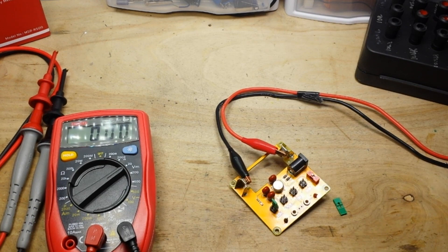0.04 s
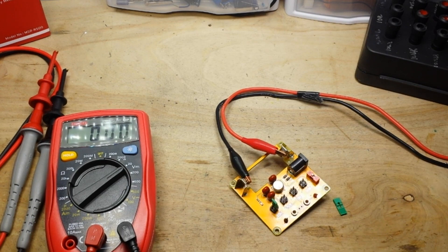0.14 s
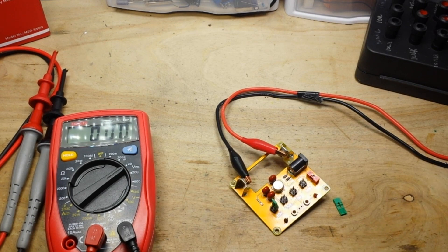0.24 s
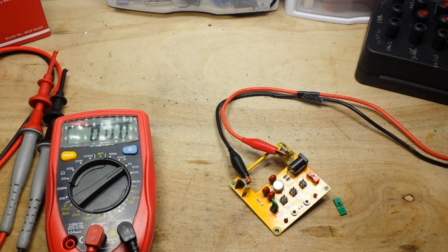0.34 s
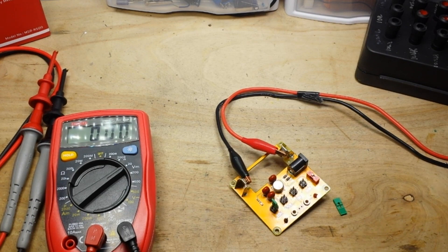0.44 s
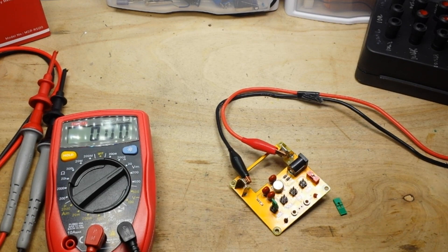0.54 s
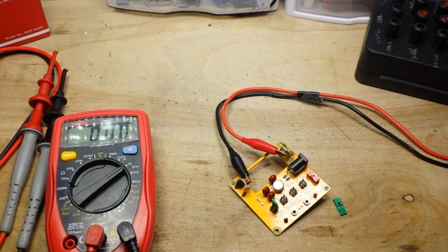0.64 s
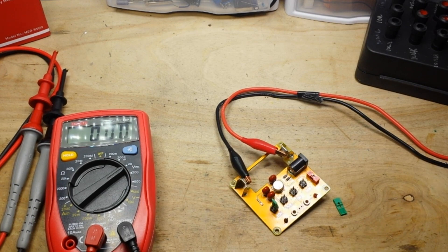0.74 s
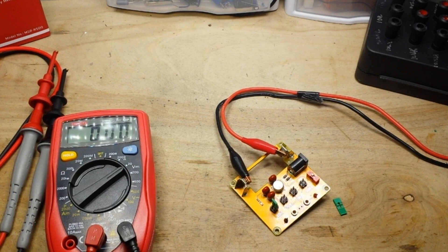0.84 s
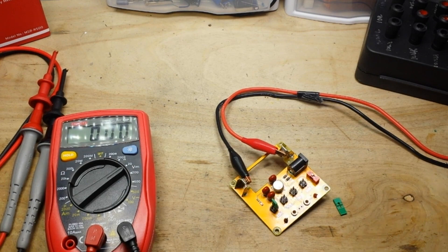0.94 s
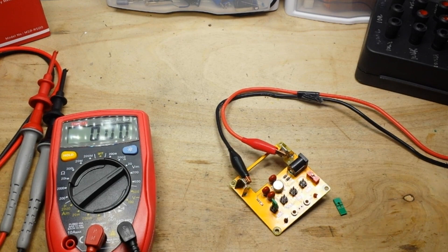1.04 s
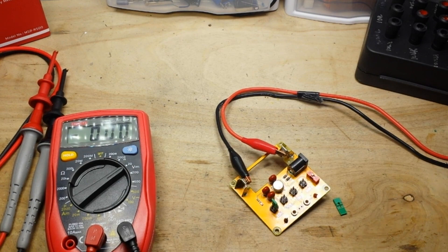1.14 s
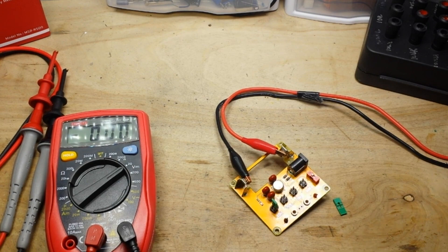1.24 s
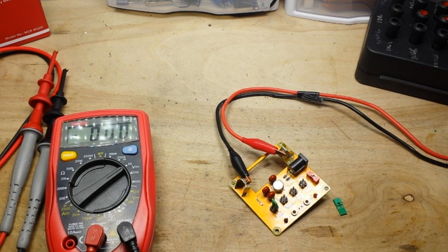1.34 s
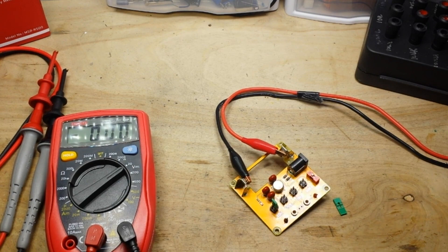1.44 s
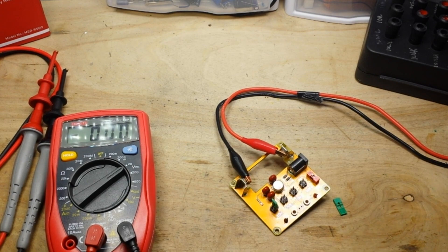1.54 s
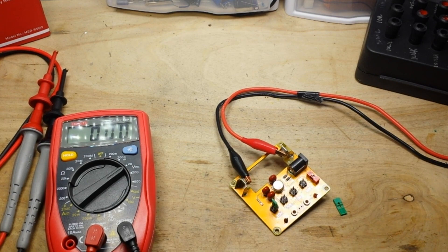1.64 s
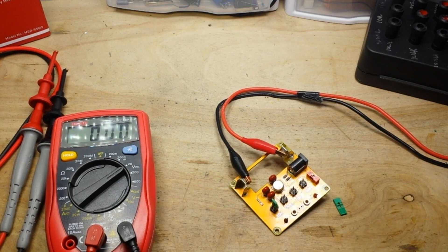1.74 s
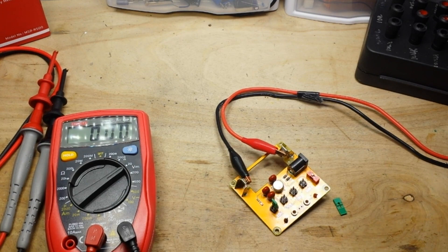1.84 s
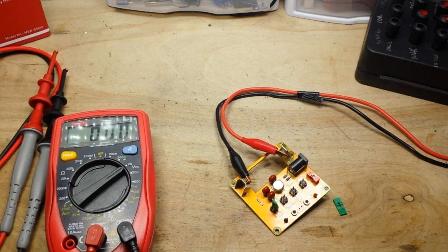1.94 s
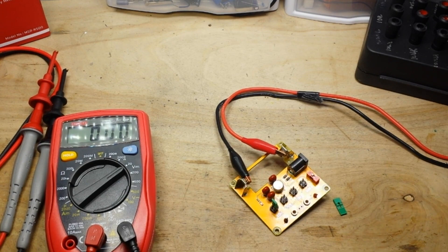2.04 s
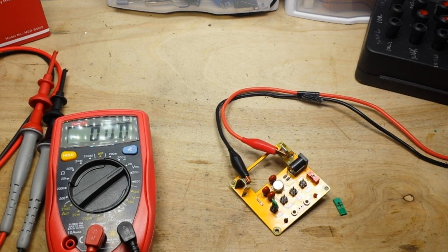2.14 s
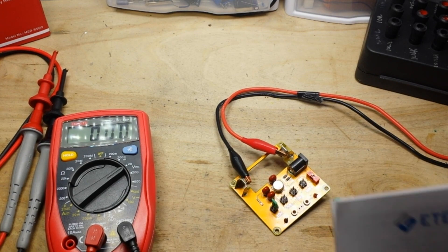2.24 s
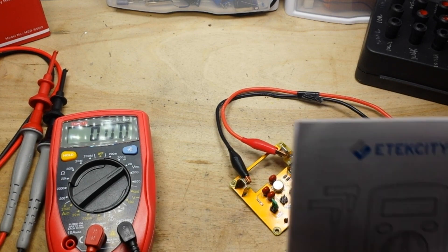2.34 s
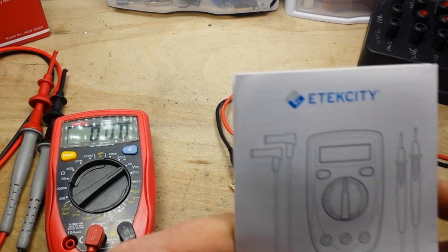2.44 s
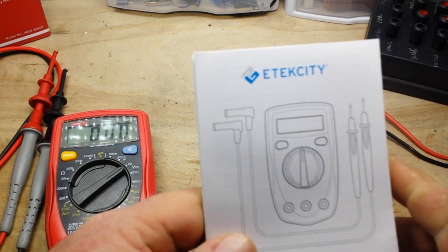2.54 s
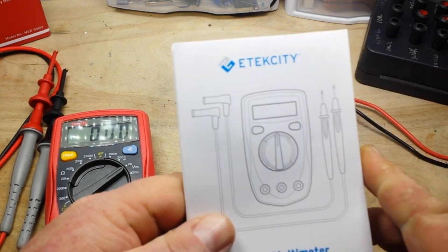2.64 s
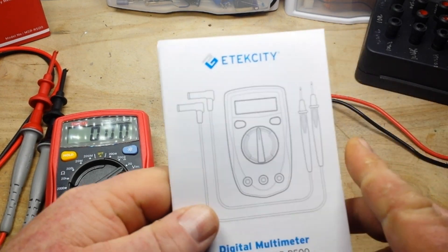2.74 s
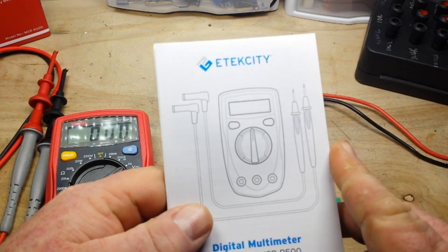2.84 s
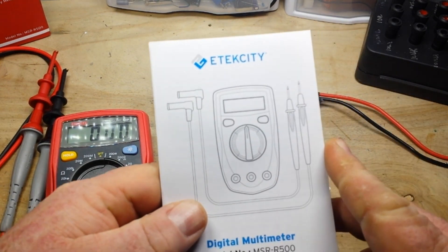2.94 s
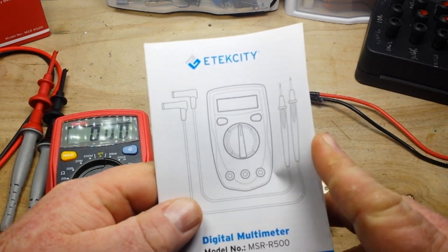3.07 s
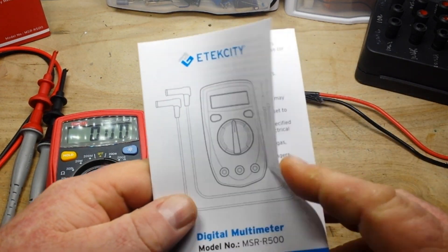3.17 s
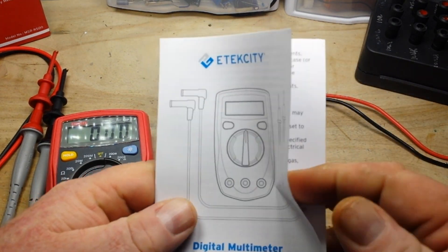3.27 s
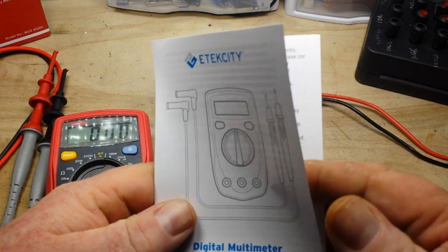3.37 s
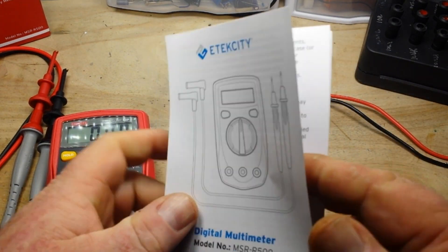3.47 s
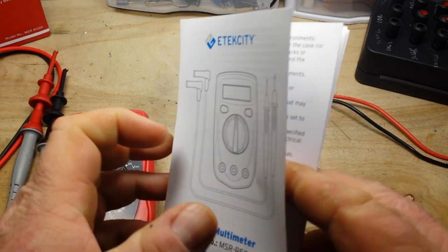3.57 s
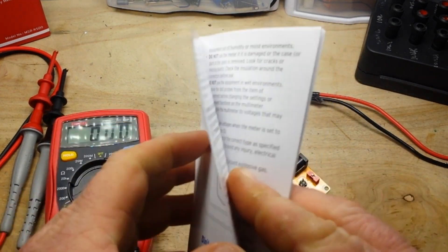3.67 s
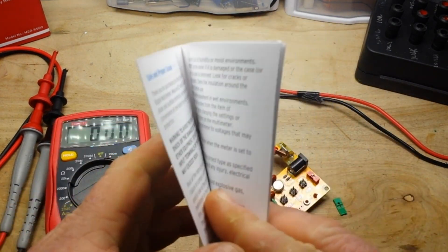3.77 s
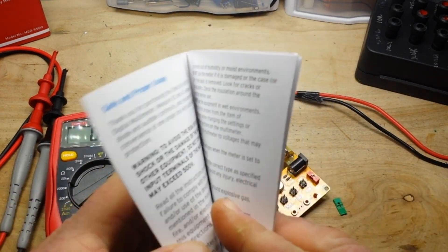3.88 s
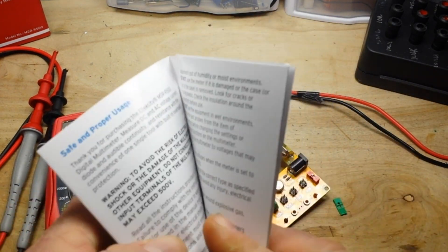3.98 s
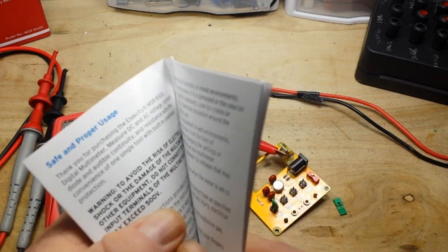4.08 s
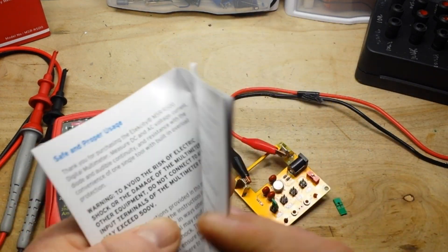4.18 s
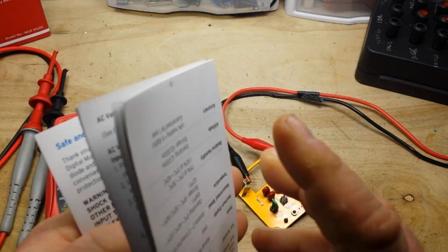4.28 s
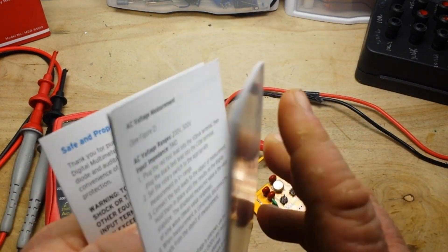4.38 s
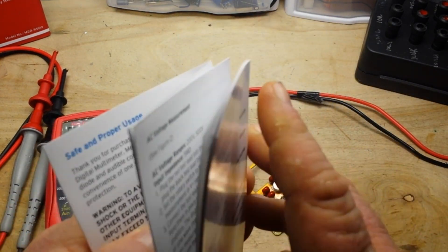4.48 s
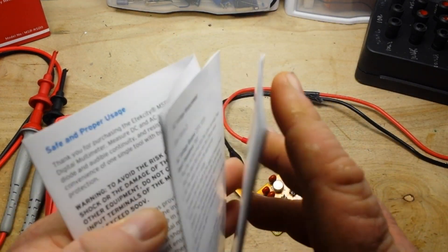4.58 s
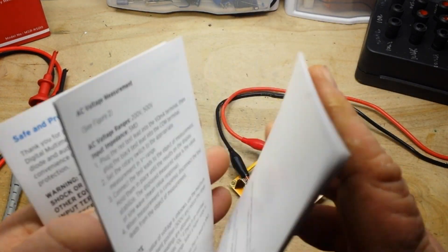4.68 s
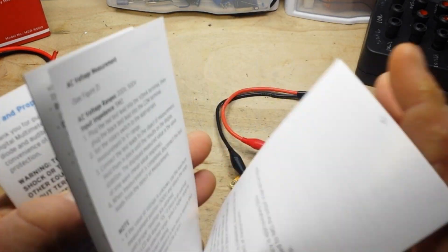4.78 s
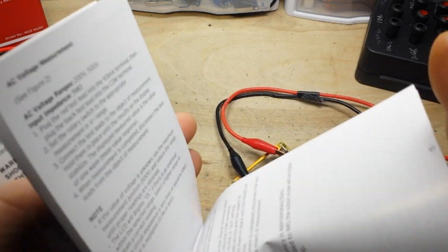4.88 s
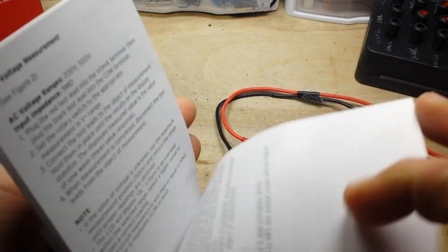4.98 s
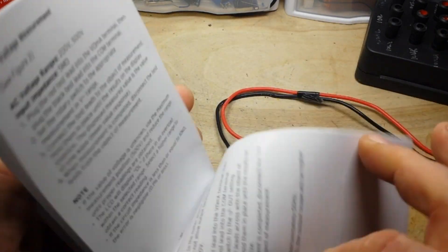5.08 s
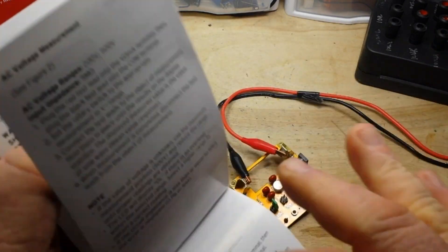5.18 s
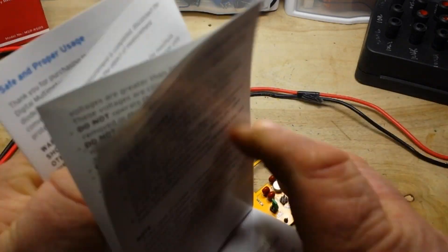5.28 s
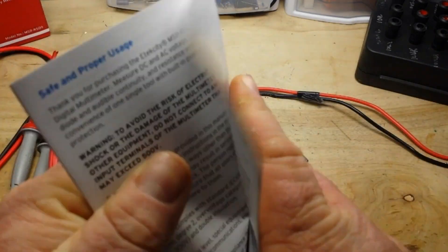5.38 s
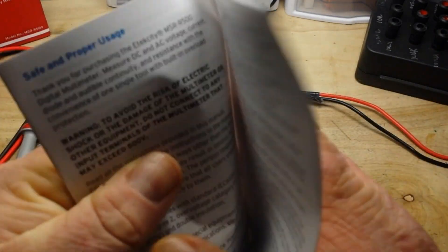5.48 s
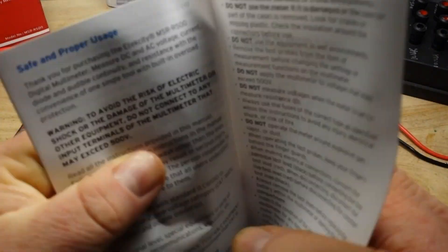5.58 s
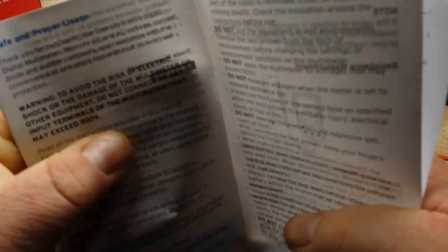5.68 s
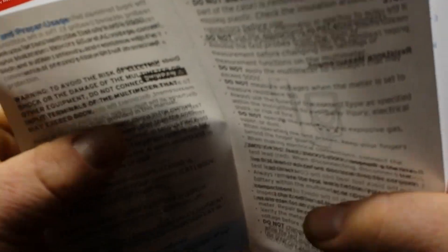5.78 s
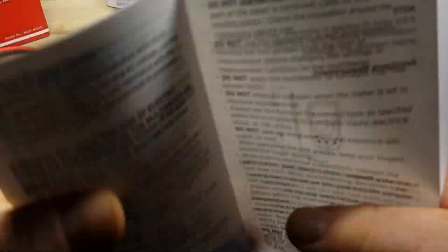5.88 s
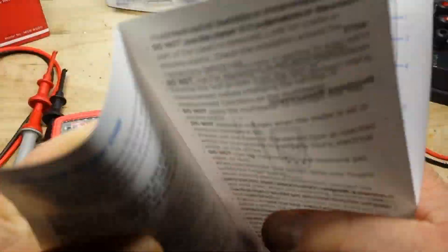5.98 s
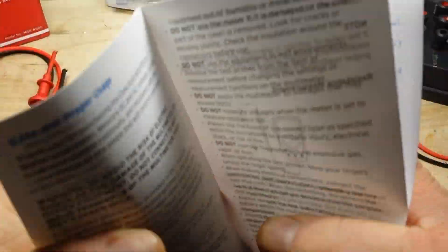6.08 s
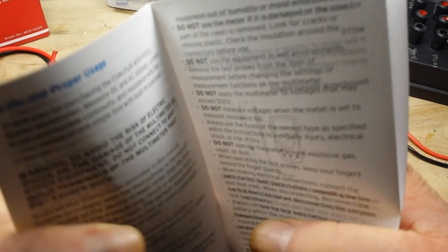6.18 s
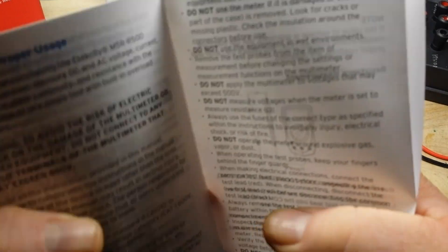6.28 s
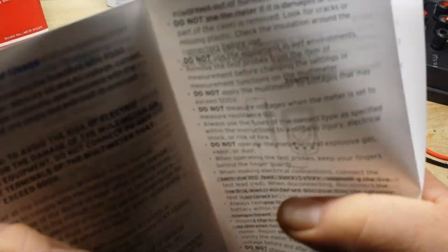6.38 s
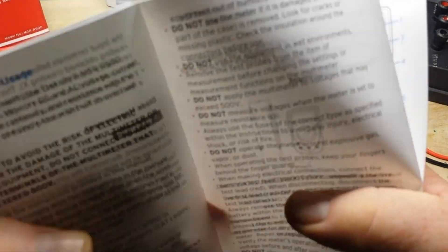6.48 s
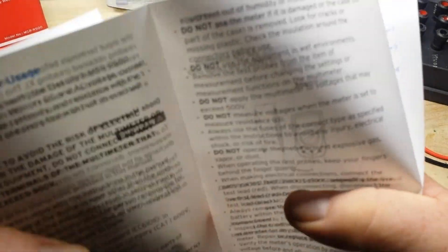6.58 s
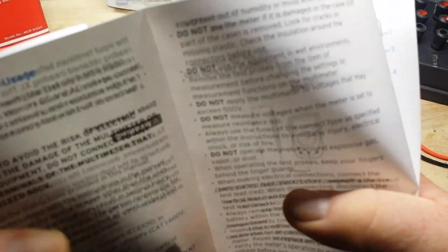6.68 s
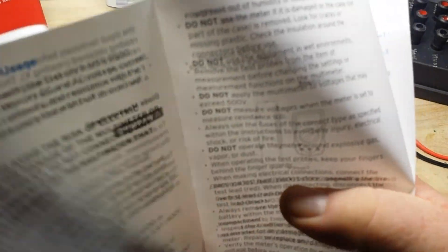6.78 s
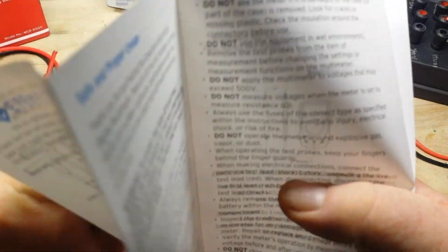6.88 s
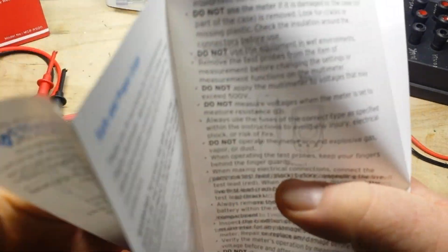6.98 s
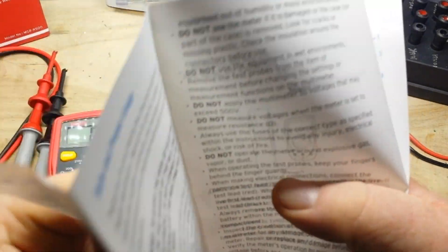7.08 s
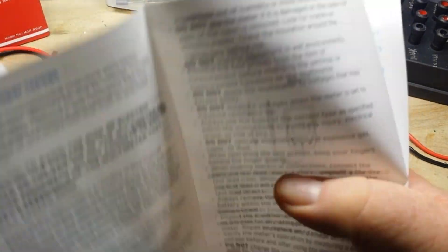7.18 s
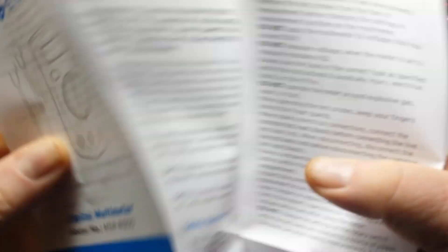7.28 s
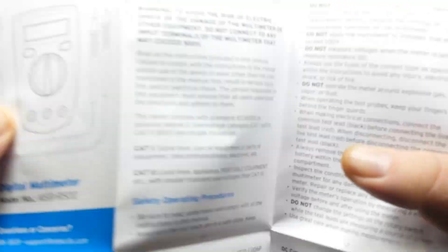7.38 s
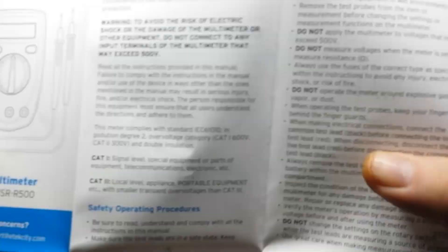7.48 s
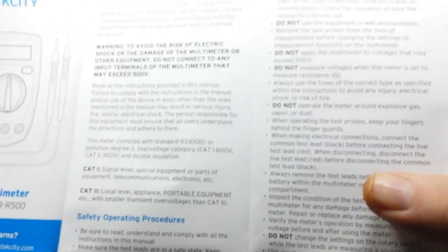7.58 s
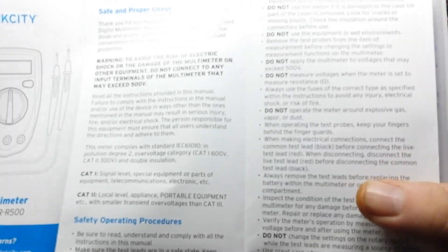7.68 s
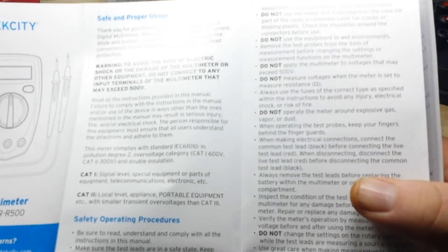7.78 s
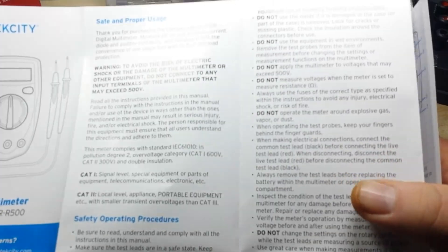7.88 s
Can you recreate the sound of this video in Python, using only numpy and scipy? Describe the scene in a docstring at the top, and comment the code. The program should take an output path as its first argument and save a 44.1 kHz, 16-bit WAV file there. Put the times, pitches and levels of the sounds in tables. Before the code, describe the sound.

A soft, steady fan drone with a barely audible thin whine runs throughout, in a small dry room. From 0 to 1 s there is almost nothing but a few tiny ticks. Around 1.1-1.9 s fingers rub softly on paper with small dry crinkles. At 2.2 s a short, high, zippy scrape marks the leaflet being picked up, then a near pause. From 3.2 to 4.3 s come gentle slides and light clicks; a crisp snap at 4.4 s starts brisker leafing, with a bright swish near 5.05 s. From 5.3 to 5.9 s creases crackle densely and sheets flap with dull pops. It quiets around 6 s, snaps again at 6.3-6.6 s, and peaks in a loud, sharp crackle at 6.8 s. Fuller, floppier rustling and pops follow at 7.2-7.6 s, then fade to faint rubbing by 7.9 s. Close stereo microphone, right side slightly earlier and brighter.

```python
"""A faint fan drones under a thin whine while fingers creep softly over a folded paper leaflet. The leaflet is
picked up, leafed through and opened out close by: creases snap, loose sheets flap, pages swish. Fan: shaped
noise, resonances and sines. Rubbing: random slips in three registers (flap, crack, fizz). Snaps: short noise
bursts through fold resonances. Pages popping over and low thuds of knocks: damped sines. Room: a short diffuse
tail. Two ports hear it all; the left one is later and shaded."""
import sys
import numpy as np
from scipy import signal
from scipy.fft import rfft, irfft
from scipy.io import wavfile
from scipy.ndimage import uniform_filter1d

SR = 44100
rng = np.random.default_rng(int(sys.argv[2]) if len(sys.argv) > 2 else 0)


def to_wav(s):
    """Save 16-bit WAV."""
    ch = np.atleast_2d(s).T  # columns
    pcm = np.round(np.clip(ch, -1, 1) * 32767)  # PCM
    wavfile.write(sys.argv[1], SR, pcm.astype(np.int16))


N = 349272


def amp(db):
    """Decibels to gain."""
    return 10 ** (np.asarray(db) / 20)


def unit(x):
    """Scales to rms 1."""
    return x / np.sqrt(np.mean(x ** 2) + 1e-20)


def read(points, hz):
    """Interpolates a table on a log-frequency axis."""
    f, value = np.transpose(points)
    return np.interp(np.log(hz + 1), np.log(f + 1), value)


def track(points, t):
    """Interpolates a (time, value) table linearly."""
    return np.interp(t, *np.transpose(points))


def bins(size):
    """Spectrum frequencies [Hz] for a number of samples."""
    return np.fft.rfftfreq(size, 1 / SR)


def resonance(hz, centre_hz, half_width_hz):
    """A peak of gain 1 that falls to half at its half width."""
    return 1 / (1 + ((hz - centre_hz) / half_width_hz) ** 2)


def noise(gain, size):
    """Noise of rms 1 with the given gain per frequency."""
    return unit(irfft(rfft(rng.standard_normal(size)) * gain, size))


def add(mix, s, sound):
    """Mixes a sound in at a time [s]."""
    part = mix[max(round(s * SR), 0):][:len(sound)]
    part += sound[:len(part)]


def causal(gain):
    """Minimum-phase impulse response with this gain."""
    log_gain = np.log(np.maximum(gain / gain.max(), 1e-4))
    circle = np.concatenate([log_gain, log_gain[-2:0:-1]])
    return gain.max() * np.fft.ifft(np.exp(np.conj(signal.hilbert(circle)))).real


def pair(a, b, likeness):
    """Two unrelated sounds become a partly alike left and right."""
    same = np.clip(read(likeness, bins(len(a))), 0, 1)
    left = same * rfft(a) + np.sqrt(1 - same ** 2) * rfft(b)
    return np.array([irfft(left, len(a)), a])


# broad fan noise: (frequency [Hz], relative density [dB])
FAN_AIR = [(20, -29), (50, -2.5), (85, -13), (115, -6), (160, -5.5), (250, 2), (350, -3.5), (600, -1.5),
           (1000, -11), (2200, -15), (3900, -20), (6000, -13.5), (7100, -11), (8500, -22), (10000, -20),
           (14500, -24.5), (16000, -67)]
# broad fan resonances: (centre [Hz], half width at half gain [Hz], level [dB])
FAN_DRONES = [(222, 14, -69.5), (292, 25, -64), (320.4, 4, -68.5), (420, 17, -73.5)]
# motor and blade tones: (frequency [Hz], level [dB])
FAN_HUM = [(59.5, -77), (120, -79.5), (205.6, -71.5), (290.7, -62.5), (300, -72), (389.5, -72),
           (419.8, -68.5)]
# left-right likeness of fan air and room echoes: (frequency [Hz], likeness [0-1])
DIFFUSE_LIKENESS = [(60, 0.54), (300, 0.76), (600, 0.24), (1200, 0), (3000, 0), (15000, 0.06)]


def fan(air_db=-57.5):
    """Steady air noise with a few resonances, and an even hum."""
    hz, t = bins(N), np.arange(N) / SR
    colour = amp(read(FAN_AIR, hz))
    air = pair(noise(colour, N), noise(colour, N), DIFFUSE_LIKENESS)
    drone = sum(amp(db) * noise(resonance(hz, f, width), N) for f, width, db in FAN_DRONES)
    hum = sum(amp(db) * np.sqrt(2) * np.sin(2 * np.pi * (f * t + rng.random())) for f, db in FAN_HUM)
    return amp(air_db) * air + drone + hum


def whine(centre_hz=1665, half_width_hz=3.9, level_db=-70.5):
    """One faint, slightly wavering tone, in opposite phase at the two ports."""
    tone = amp(level_db) * noise(resonance(bins(N), centre_hz, half_width_hz), N)
    return np.array([tone, -tone])


# how loudly the sheet flaps as the leaflet is handled: (time [s], flap at the usual force [dB])
FLAP_LOUDNESS = [(0, -46.5), (3.2, -31.5), (4.3, -38.5), (5.05, -38.5), (5.45, -37.5), (6.3, -37),
                 (6.83, -35.5), (7.25, -33), (7.92, -38.5)]
USUAL_FORCE_DB = -40
FLAP_GROWTH = 0.82  # dB per dB of force


def flap_level(s, force_db):
    """How loudly the whole sheet answers a force at a given time."""
    return track(FLAP_LOUDNESS, s) + FLAP_GROWTH * (force_db - USUAL_FORCE_DB)


FLAP_BRIGHT_LOSS = 0.63  # dB per dB of brightness


def rub_power(s, level_db, bright_db):
    """The power of a rub as flap, crack and fizz; bright rubs flap less."""
    flap_db = flap_level(s, level_db) - FLAP_BRIGHT_LOSS * bright_db
    return amp(np.vstack([flap_db, level_db, level_db + bright_db])) ** 2


# All rub levels below precede the register offsets in paper().
# soft creeping of the hands over the paper, rising and falling with the grip: (time [s], level [dB])
GRIP = [(0, -70), (1.03, -68.5), (1.15, -61.5), (1.82, -61.5), (1.95, -80), (2.33, -60.5), (2.5, -75),
        (2.9, -62), (3.3, -68), (3.62, -65.5), (4.25, -53), (4.58, -58.5), (5.15, -55), (5.27, -51.5),
        (5.6, -43), (5.98, -56.5), (6.45, -57.5), (6.9, -49.5), (7.45, -50.5), (7.56, -44.5), (7.78, -64),
        (7.92, -51)]
GRIP_BRIGHT_DB = 3
# fingers drawn evenly along the paper: (start [s], length [s], level [dB], fizz over crack [dB])
SLIDES = [(0, 0.11, -63, 6), (1.232, 0.2, -55.5, 1), (1.672, 0.036, -68, 19.5), (2.223, 0.061, -56.5, 11.5),
          (3.299, 0.13, -54.5, 7), (3.492, 0.018, -59.5, 8), (3.666, 0.15, -56, 6.5),
          (3.927, 0.22, -53.5, 8), (4.189, 0.09, -47, 9), (4.444, 0.019, -57, 4), (4.643, 0.092, -53, 7),
          (4.799, 0.063, -42.5, 3.5), (4.988, 0.064, -37.5, 3), (5.125, 0.038, -40.5, 4),
          (5.295, 0.049, -43, 0), (5.473, 0.051, -40.5, 5), (5.625, 0.11, -40, 3), (6, 0.086, -50, 3),
          (6.518, 0.073, -50, 7.5), (6.572, 0.045, -43, 3.5), (6.729, 0.027, -46.5, 2),
          (6.824, 0.071, -42.5, 1.5), (7.26, 0.037, -41.5, 1), (7.582, 0.015, -60, -1)]
SLIDE_ATTACK_S, SLIDE_RELEASE_S = 0.013, 0.038
# quick page swishes: (peak time [s], level [dB], fizz over crack [dB], flap [dB], rise [s], fall [s])
SWISHES = [(1.11, -48.5, 7.5, -51, 0.012, 0.019), (2.212, -50, 17, -48, 0.0057, 0.013),
           (2.294, -54, 8, -48, 0.011, 0.011), (3.199, -46.5, 5, -52.5, 0.019, 0.046),
           (4.682, -36, 7.5, -42, 0.006, 0.0041), (4.917, -40.5, 4.5, -44, 0.0081, 0.017),
           (5.055, -25, 10.5, -41, 0.023, 0.004), (5.353, -43.5, 12.5, -40, .005, 0.0069),
           (5.42, -33.5, 6, -35, 0.018, 0.011), (5.531, -39, 8, -41, 0.0054, .006),
           (5.584, -34, 3.5, -35, 0.007, 0.0069), (6.272, -38, 4.5, -43, 0.021, 0.013),
           (6.29, -33.5, 0, -40.5, 0.012, 0.0091), (6.827, -29, 11, -36, 0.0089, 0.0089),
           (7.149, -33, 3.5, -39, 0.022, 0.011), (7.205, -39.5, 4.5, -44, 0.018, 0.044),
           (7.337, -29.5, 0, -37, 0.0044, 0.033), (7.373, -31, -7, -31, 0.012, 0.024)]


def rubbing():
    """Rubbing strength per register: the creep of the grip, even slides, and swishes that swell and die."""
    t = np.arange(N) / SR
    power = rub_power(t, track(GRIP, t), GRIP_BRIGHT_DB)
    for s, length, level_db, bright_db in SLIDES:
        near = slice(*np.searchsorted(t, [s, s + length + .2]))
        lag = t[near] - s
        attack = np.minimum(lag / SLIDE_ATTACK_S, 1)
        release = np.exp(-np.maximum(lag - length, 0) / SLIDE_RELEASE_S)
        power[:, near] += rub_power(s, level_db, bright_db) * (attack * release) ** 2
    for s, level_db, bright_db, flap_db, rise, fall in SWISHES:
        near = slice(*np.searchsorted(t, [s - .2, s + .2]))
        lag = t[near] - s
        swell = np.exp(np.minimum(lag / rise, -lag / fall))
        power[:, near] += (amp([[flap_db], [level_db], [level_db + bright_db]]) * swell) ** 2
    return np.sqrt(power)


def bending(x, patchy_db=3.0, frames=22, bands=5):
    """As the sheet bends, its resonances wander and recolour the friction."""
    z = signal.stft(x, nperseg=256)[2]
    patches = rng.standard_normal(z.shape)
    for _ in range(2):
        patches = uniform_filter1d(patches, frames, axis=1)
        patches = uniform_filter1d(patches, bands, axis=0)
    return signal.istft(z * amp(patchy_db * unit(patches)), nperseg=256)[1][:N]


# narrow gap between two pages: (time [s], pitch = 1 / echo delay [Hz], share sent back [0-1])
GAP = [(0, 2290, 0), (1.3, 2180, 0.43), (2.2, 1830, 0.07), (3.7, 2280, 0.3), (3.99, 2110, 0.36),
       (4.08, 1840, 0.6), (4.18, 2050, 0.46), (4.26, 1730, 0.2), (4.6, 2210, 0.05), (5.05, 2570, 0.11),
       (5.58, 1680, 0), (6.3, 1970, 0.3), (6.83, 3030, 0.1), (7.35, 1760, 0), (7.92, 2200, 0)]


def hollow(x):
    """One echo across the gap between the pages; its notches glide as the gap changes."""
    t = np.arange(N) / SR
    s, pitch_hz, share = np.transpose(GAP)
    back = np.clip(np.interp(t, s, share), 0, 1)
    echo = np.interp(t - 1 / np.interp(t, s, pitch_hz), t, x)
    return (x + back * echo) / np.sqrt(1 + back ** 2)


FLAP_CRACK_EDGE_HZ, CRACK_FIZZ_EDGE_HZ = 700, 4500


def registers(colour, hz):
    """Splits a colour into the flap of whole sheets, the crack of creases and the fizz of fibres."""
    above_flap = 1 / (1 + (FLAP_CRACK_EDGE_HZ / (hz + 1)) ** 10)
    above_crack = 1 / (1 + (CRACK_FIZZ_EDGE_HZ / (hz + 1)) ** 10)
    shares = [1 - above_flap, above_flap * (1 - above_crack), above_crack]
    return amp(read(colour, hz)) * np.sqrt(shares)


# colour of sliding paper: (frequency [Hz], relative density [dB])
SLIDE_COLOUR = [(40, -10.5), (110, 5.5), (280, -0.5), (420, 5.5), (720, -10.5), (1400, -5), (2300, -5.5),
                (3200, -7), (4500, -11.5), (6000, -6.5), (7400, -3), (9000, -13), (12500, -21),
                (14500, -33.5), (16000, -69)]


def friction(slips_per_s=2000, spread_db=3.0, smooth=0.71, judder_db=2.5, judder_hz=90, size=1024):
    """Tiny slips of uneven size over a smooth hiss, clumped by the judder of the grip; one row a register."""
    judder = amp(judder_db * noise(1 / (1 + (bins(N) / judder_hz) ** 4), N))
    sizes = amp(spread_db * np.minimum(rng.exponential(1, N), 4.5))
    slips = (rng.random(N) < slips_per_s / SR) * sizes * rng.choice([-1, 1], N)
    drive = bending(judder * (unit(slips) + smooth * rng.standard_normal(N)))
    gains = registers(SLIDE_COLOUR, bins(size))
    flap, crack, fizz = (signal.oaconvolve(drive, causal(g))[:N] for g in gains)
    return np.array([unit(flap), unit(hollow(crack)), unit(fizz)])


def crinkles(push, level_db=-9.5, spread_db=7.0, limit_db=-23.0, low_hz=1300, high_hz=4500,
             cycles=0.89, count=700, size=1024):
    """Small facets buckle at random under the rubbing, each with a short ring of its own pitch."""
    out, t = np.zeros(N), np.arange(size) / SR
    force = np.minimum(push, amp(limit_db))  # a facet gives way beyond a certain force
    for when, pitch, strength in rng.random((count, 3)):
        hz = low_hz * (high_hz / low_hz) ** pitch
        db = level_db + spread_db * min(-np.log(1 - strength), 4)
        ring = np.exp(-hz * t / cycles) * np.sin(2 * np.pi * hz * t)
        add(out, when * N / SR, force[int(when * N)] * amp(db) * ring)
    return out


def folds(hz, uneven_db=0.83, nearest_s=0.00033, farthest_s=0.00089, count=6):
    """Waves come back from nearby folds and edges, giving each snap resonances of its own."""
    echoes_s = nearest_s + (farthest_s - nearest_s) * rng.random(count)
    ripple = rng.choice([-1, 1], count) @ np.cos(2 * np.pi * np.outer(echoes_s, hz))
    return amp(uneven_db * unit(ripple))


def burst(gain, envelope, size=45):
    """A short spray of noise: its broad colour follows the gain, its fine resonances fall by chance."""
    spray = noise(gain, len(envelope)) * envelope
    wanted = abs(uniform_filter1d(unit(gain) ** 2, size)) + 1e-4
    got = abs(uniform_filter1d(unit(abs(rfft(spray))) ** 2, size)) + 1e-4
    return signal.fftconvolve(spray, causal(np.sqrt(wanted / got)))[:len(envelope)]


# creases snapping, sheets tapping; the register ring factors scale the decay:
# (time [s], crack [dB], brightness = fizz over crack [dB], facet pitch [Hz], base decay [s])
SNAPS = [(0.29, -54, -16, 1550, 0.0024), (0.467, -56, -32, 1100, 0.006), (0.5217, -52, -10, 1100, 0.0075),
         (1.205, -59.5, -1, 1800, .001), (1.309, -64.5, 20.5, 1900, 0.0019),
         (1.361, -57, -17, 2350, 0.0025), (1.3725, -41, -15, 1760, 0.00096),
         (1.38, -48.5, -2, 1200, 0.0044), (1.392, -51, 0, 1900, 0.005), (1.433, -46, -17, 1900, 0.0024),
         (1.445, -54, 2, 1480, 0.0068), (1.493, -55.5, -20, 900, 0.0017), (1.501, -51, -25, 1100, 0.0027),
         (1.5835, -54, -38, 2030, .0015), (1.611, -48.5, 4, 1370, 0.0092),
         (1.7458, -45.5, -18, 3180, 0.0014), (1.7468, -41.5, -47, 2420, 0.0035),
         (1.8303, -51.5, 2.5, 1820, 0.0027), (1.838, -50, 0.5, 1090, 0.0091), (2.2027, -42, 4, 1660, 0.005),
         (2.342, -64, -18, 2420, .0015), (3.249, -56, -4, 2300, .001), (3.4209, -41.5, -11, 2600, 0.0002),
         (3.719, -45.5, 6.5, 2560, 0.007), (3.7458, -39, -4, 2580, 0.0022), (4.2736, -52, -6, 1770, 0.0022),
         (4.297, -53, 16, 3000, 0.0025), (4.315, -42, -39, 1850, 0.0015), (4.4217, -28.5, 9, 2970, 0.0014),
         (4.47, -52.5, 10, 3000, .001), (4.699, -39.5, -30, 1930, 0.0028),
         (4.7238, -48.5, 5, 3000, 0.00055), (4.7817, -45.5, 3.5, 2100, 0.0003),
         (4.797, -40, 6.5, 2310, 0.0095), (4.8162, -48.5, 5, 2600, .0005),
         (4.9137, -41.5, 9.5, 2350, 0.002), (5.085, -34.5, 12.5, 3980, 0.00093),
         (5.1267, -25.5, 9, 2860, 0.0015), (5.137, -42, 9, 2900, 0.0033), (5.162, -47, -12, 2110, .002),
         (5.2186, -41, -12, 2140, 0.0025), (5.313, -55, 8, 2400, 0.0007), (5.3255, -41, -14, 1800, 0.0014),
         (5.329, -28, -11, 2200, 0.0012), (5.451, -37.5, 2, 1420, 0.0037), (5.463, -42, -6, 1300, 0.0026),
         (5.485, -38, -8, 1410, 0.0036), (5.496, -41, -11, 1700, 0.0036), (5.515, -48, 8, 2600, 0.00069),
         (5.565, -40, -12, 1880, 0.0024), (5.581, -31.5, -32, 1570, 0.0049),
         (5.634, -31, -25, 1600, 0.0038), (5.6408, -23, 0, 2050, 0.0022), (5.676, -36, -6, 1400, 0.0012),
         (5.6931, -23.5, 6, 1780, 0.00054), (5.7099, -24.5, -0.5, 2120, 0.0014),
         (5.755, -24, -5, 2380, 0.0018), (5.761, -26.5, -10, 1800, 0.0013), (5.8096, -33, 4, 1610, 0.0021),
         (5.8354, -30.5, 5.5, 4630, 0.0014), (5.8905, -28, 0.5, 1690, 0.0013),
         (5.917, -33, -9, 1730, 0.0032), (6.2974, -41, 6, 2600, 0.00095), (6.358, -53.5, -25, 1460, 0.0017),
         (6.4188, -61.5, 21, 1980, 0.0035), (6.499, -42.5, -4, 1800, 0.00094),
         (6.5066, -33.5, -11, 1740, 0.0026), (6.5992, -40, -16, 1550, 0.00082),
         (6.6021, -25, -4, 2150, 0.0021), (6.636, -38.5, -10, 1690, 0.0024),
         (6.721, -41.5, -4, 3180, 0.0023), (6.776, -23.5, 4, 2630, 0.0013),
         (6.801, -24.5, -6, 2850, 0.0015), (6.8268, -19.5, 3.5, 3370, 0.003),
         (6.8371, -25.5, 5.5, 3200, 0.0026), (6.843, -24, -1, 3200, 0.0025),
         (6.849, -28.5, 1, 2780, 0.0028), (6.8734, -37, -8, 1510, 0.0025), (6.876, -30.5, -8, 1470, 0.0023),
         (6.9084, -30, -10, 1590, 0.0021), (7.025, -40.5, 5.5, 2300, 0.0019),
         (7.201, -38.5, 3.5, 1660, 0.0018), (7.216, -46, -5, 1900, 0.0023), (7.227, -42, -6, 1170, 0.002),
         (7.2744, -37, -17, 1350, 0.0022), (7.295, -43, -16, 1880, 0.0023), (7.305, -36, 8, 2560, 0.0026),
         (7.3123, -25.5, 10, 2110, 0.0015), (7.337, -39, -4, 1400, .002), (7.3581, -30.5, -6, 1640, 0.0035),
         (7.37, -26, -8, 3040, 0.002), (7.392, -47, 1, 2300, .002), (7.4675, -37, -7, 1410, 0.0013),
         (7.471, -30, -2.5, 2150, 0.0018), (7.484, -42, -15, 2025, .002), (7.495, -47, -1, 2200, .001),
         (7.52, -43.5, -10, 1440, 0.0014), (7.535, -30.5, -7, 1690, 0.0025),
         (7.54, -26, -4.5, 1920, 0.0019), (7.584, -43, -10, 1540, 0.0028), (7.595, -37.5, -8, 1530, 0.0022)]
# colour of snapping paper: (frequency [Hz], relative density [dB])
SNAP_COLOUR = [(40, -38), (90, -9), (170, 4), (420, 3), (750, -0.5), (1300, -4), (3000, -5), (4800, 1.5),
               (6000, 4), (7400, 9), (9000, -5), (11500, -13), (14500, -18.5), (16400, -63)]
# crack width at brightness 0 dB, and the brightness that doubles it
CRACK_OCTAVES, WIDEN_DB = 0.93, 25
# crisp snaps spit in the top octave: its edge, that edge's width
TOP_HZ, TOP_WIDTH_HZ = 8370, 400
# brightness leaving the top unchanged, greatest change, growth in dB per dB of brightness
TOP_EVEN_DB, TOP_LIMIT_DB, TOP_GROWTH = 7, 4.5, 1.6
# small facets flap less
FLAP_LOSS_DB_PER_OCTAVE, USUAL_FACET_HZ = 9.5, 2000
LEVEL_SPAN_S = .01  # a snap's level is its rms over this span


def snaps(flap_db=-10.5, flap_s=0.0092, flap_rise_s=0.0004, crack_ring=3.08, fizz_ring=2.6,
          rise_s=0.00008, ring_db=-2.5, ring_width=0.13, size=2048):
    """A buckle runs along a crease and stops: fibres fizz, the crease rings, the whole sheet flaps."""
    out, t, hz = np.zeros(N), np.arange(size) / SR, bins(size)
    flap, crack, fizz = registers(SNAP_COLOUR, hz)
    top = .5 + .5 * np.tanh((hz - TOP_HZ) / TOP_WIDTH_HZ)
    for s, level_db, bright_db, centre_hz, decay in SNAPS:
        octaves = CRACK_OCTAVES * 2 ** (bright_db / WIDEN_DB)
        facet = np.exp(-.5 * (np.log2((hz + 1) / centre_hz) / octaves) ** 2)  # small facets ring high
        ring = 1 + amp(ring_db) * resonance(hz / centre_hz, 1, ring_width)
        body = causal(ring * folds(hz))
        top_db = np.clip(TOP_GROWTH * (bright_db - TOP_EVEN_DB), -TOP_LIMIT_DB, TOP_LIMIT_DB)
        spit = amp(top * top_db)
        low_db = flap_level(s, level_db) + flap_db
        low_db -= FLAP_LOSS_DB_PER_OCTAVE * np.log2(centre_hz / USUAL_FACET_HZ)
        for gain, db, rise, fall in ((flap, low_db, flap_rise_s, flap_s),
                                     (crack * facet, level_db, rise_s, decay * crack_ring),
                                     (fizz * spit, level_db + bright_db, rise_s, decay * fizz_ring)):
            envelope = (1 - np.exp(-t / rise)) / np.cosh(2 * t / fall)  # holds a moment, then dies
            sound = signal.fftconvolve(burst(gain, envelope), body)[:size]
            add(out, s, amp(db) * sound * np.sqrt(LEVEL_SPAN_S * SR / np.sum(sound ** 2)))
    return out


def edge_zip(start_s=2.2025, level_db=-22, centre_hz=7050, half_width_hz=470, decay_s=0.012):
    """The leaflet's edge catches as it is picked up: a narrow, high scrape starts at once and fades."""
    lag = np.maximum(np.arange(N) / SR - start_s, 0)
    scrape = noise(resonance(bins(N), centre_hz, half_width_hz), N)
    return amp(level_db) * (lag > 0) * np.exp(-lag / decay_s) * scrape


# low swings of pages popping over, and the low thud under some knocks: (time [s], peak level [dB], pitch [Hz],
# decay [s])
BILLOWS = [(4.2749, -32, 404, 0.0027), (4.915, -38, 168, 0.0024), (5.316, -37, 333, 0.0056),
           (5.449, -27.5, 204, 0.0029), (5.463, -29, 384, .003), (5.602, -28, 330, 0.0032),
           (5.676, -29, 423, 0.0049), (5.752, -32.5, 150, 0.013), (5.812, -30, 300, 0.0021),
           (5.8895, -20.5, 426, 0.0017), (6.505, -25, 193, 0.0081), (6.508, -22.5, 415, 0.0057),
           (6.602, -29, 411, 0.014), (6.799, -29, 230, 0.0056), (6.84, -31, 162, 0.014),
           (7.202, -26, 180, 0.0032), (7.215, -34, 404, .003), (7.229, -29, 230, 0.0024),
           (7.235, -28, 194, 0.0026), (7.279, -27, 236, 0.0036), (7.312, -31, 465, 0.0027),
           (7.359, -23, 266, 0.0053), (7.394, -26.5, 355, 0.0028), (7.468, -34, 402, 0.0057),
           (7.519, -28.5, 210, 0.003), (7.542, -31, 219, 0.0031), (7.584, -33.5, 390, 0.0044)]


def billows(rise_s=0.0014, size=4096):
    """The lowest, damped swing of a page, or the low thud of a knock."""
    out, t = np.zeros(N), np.arange(size) / SR
    for s, db, hz, decay in BILLOWS:
        swing = (1 - np.exp(-(t / rise_s) ** 2)) * np.exp(-t / decay) * np.sin(2 * np.pi * hz * t)
        add(out, s, amp(db) * swing / abs(swing).max())
    return out


def paper(push, flap_db=-6.0, crack_db=-2.5, fizz_db=0.0):
    """Snaps, zip and friction sent out in one direction; the fine grain differs in every direction."""
    return snaps() + edge_zip() + amp([flap_db, crack_db, fizz_db]) @ (push * friction())


# left-right likeness of the wide sheet's direct sound: (frequency [Hz], likeness [0-1])
SHEET_LIKENESS = [(60, 1), (300, 0.92), (700, 0.99), (2000, 0), (6000, 0), (15000, 0.2)]
# direct sound at the left port, shaded from the leaflet: (frequency [Hz], gain [dB])
SHADE = [(60, -4), (350, -2.5), (1300, -1.5), (2400, -2.5), (4400, -5), (6400, -7.5), (7400, -17),
         (9300, -4), (11000, -15.5), (15000, -10.5)]
# where the leaflet is held, as extra treble at the left port: (time [s], gain [dB])
LEFTWARD = [(0, -1.5), (1.9, 10.5), (2.2, 6.5), (3.4, 3), (4.3, 0.5), (5.1, 2), (5.7, -0.5), (6.8, 1.5),
            (7.3, 1.5), (7.6, 2.5), (7.92, 1.5)]


def ports(front, aside, shadow_hz=1500, lag_samples=5, size=1024):
    """Direct sound reaches the right port first; the left one hears it later and shaded."""
    left, right = pair(front, aside, SHEET_LIKENESS)
    shade = causal(amp(read(SHADE, bins(size))))
    left = signal.oaconvolve(left, np.concatenate([np.zeros(lag_samples), shade]))[:N]
    treble = signal.sosfilt(signal.butter(1, shadow_hz, "high", fs=SR, output="sos"), left)
    extra = amp(track(LEFTWARD, np.arange(N) / SR)) - 1
    return np.array([left + extra * treble, right])


# room decay: (frequency [Hz], t60 [s])
ROOM = [(200, 0.13), (530, 0.24), (1400, 0.083), (3700, 0.12), (9700, 0.11), (15000, 0.15)]


def room(x, wet_db=-13.0, build_s=0.00049, size=16384):
    """A short diffuse tail, each band dying at its own speed."""
    hz, t, z = signal.stft(rng.standard_normal((2, size)), SR, nperseg=256)
    decay = amp(-60 * t / read(ROOM, hz)[:, None])
    tails = signal.istft(z * decay, SR, nperseg=256)[1][:, :size]
    tails *= 1 - np.exp(-(np.arange(size) / SR / build_s) ** 2)
    tails = pair(*tails / np.linalg.norm(tails, axis=1, keepdims=True), DIFFUSE_LIKENESS)
    return amp(wet_db) * signal.oaconvolve(x[None], tails, axes=1)[:, :N]


# diffuse sound at the left port, which lacks the right one's treble resonance: (frequency [Hz], gain [dB])
DIFFUSE_SHADE = [(100, 1), (220, 3.5), (600, -2), (1400, 2.5), (2600, 4.5), (5500, -1), (7200, -7),
                 (9300, -2), (14000, -2.5)]


def diffuse_ports(x):
    """Colours sound that arrives from all sides as the two ports hear it."""
    left = irfft(rfft(x[0]) * amp(read(DIFFUSE_SHADE, bins(N))), N)
    return np.array([left, x[1]])


def scene():
    """The paper close by, its room, the fan and a faint whine."""
    push = rubbing()
    rings = billows() + crinkles(push[1])
    front = paper(push) + rings
    aside = paper(push) + rings
    diffuse = room(front) + room(aside) + fan()
    return ports(front, aside) + diffuse_ports(diffuse) + whine()


def record(dry, limit=.85, edge_hz=16400):
    """Clips peaks beyond the limit, then cuts the band above the edge."""
    limited = np.clip(dry, -limit, limit)
    lowpass = signal.firwin(255, edge_hz, window=("kaiser", 8), fs=SR)
    return signal.oaconvolve(limited, lowpass[None], "same")


dry = scene()
out = record(dry)
to_wav(out)
```